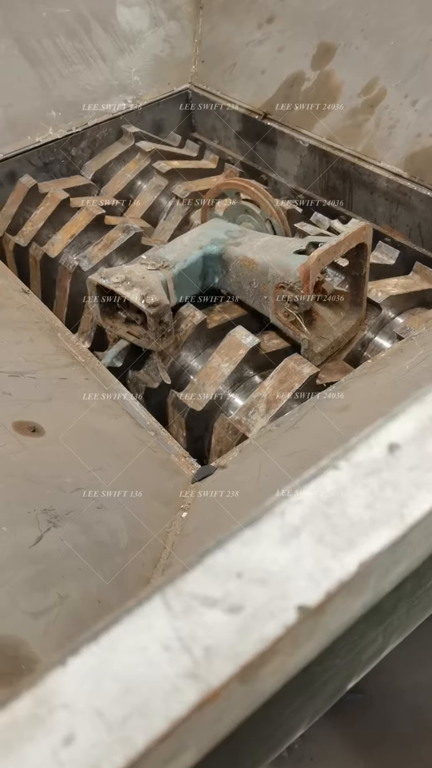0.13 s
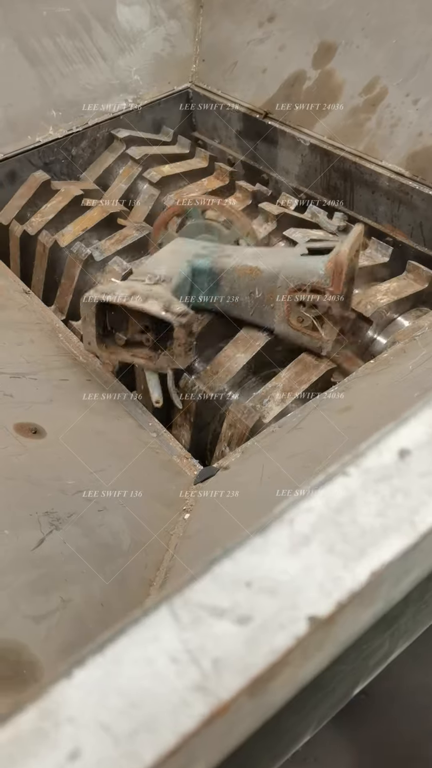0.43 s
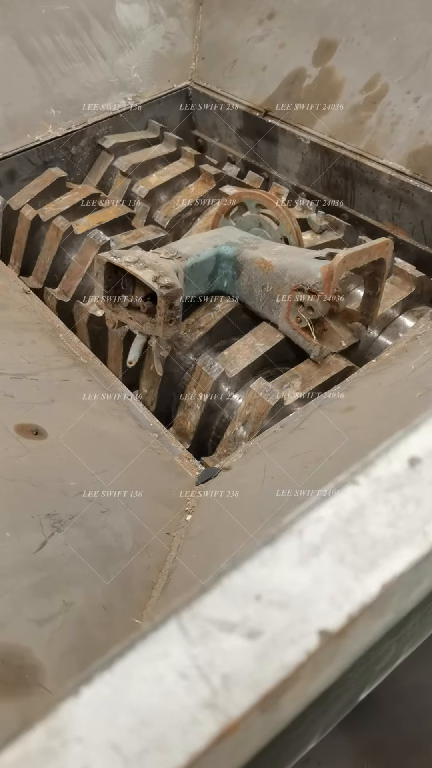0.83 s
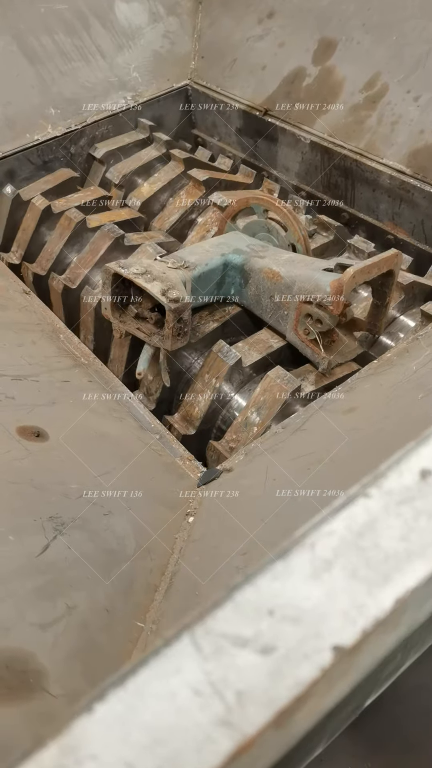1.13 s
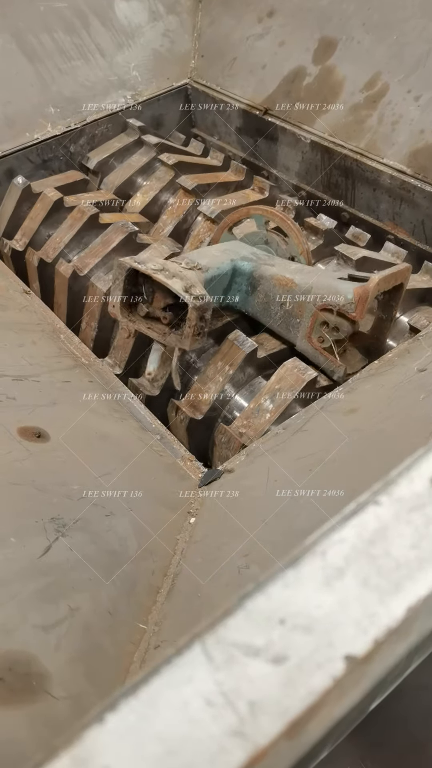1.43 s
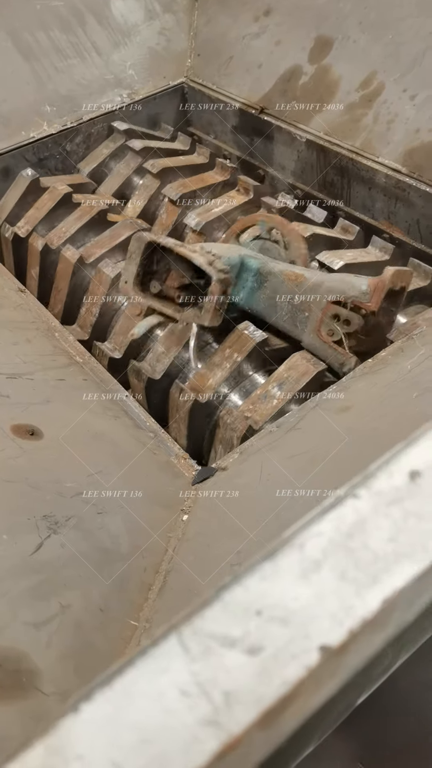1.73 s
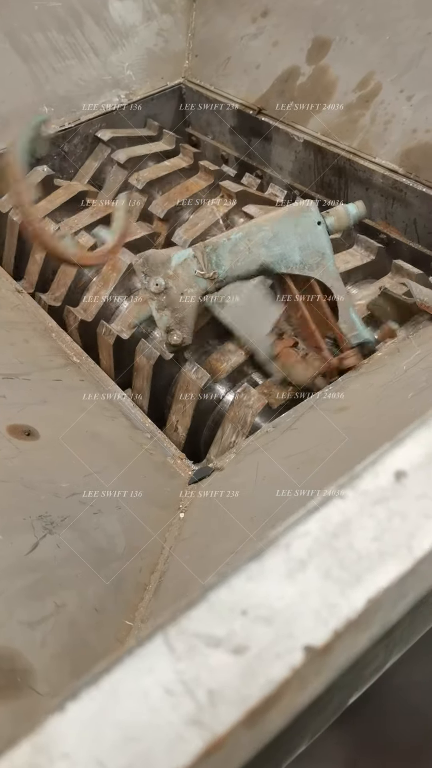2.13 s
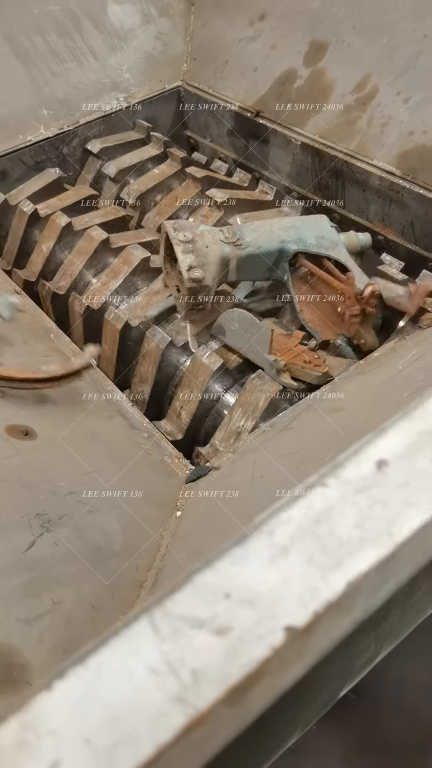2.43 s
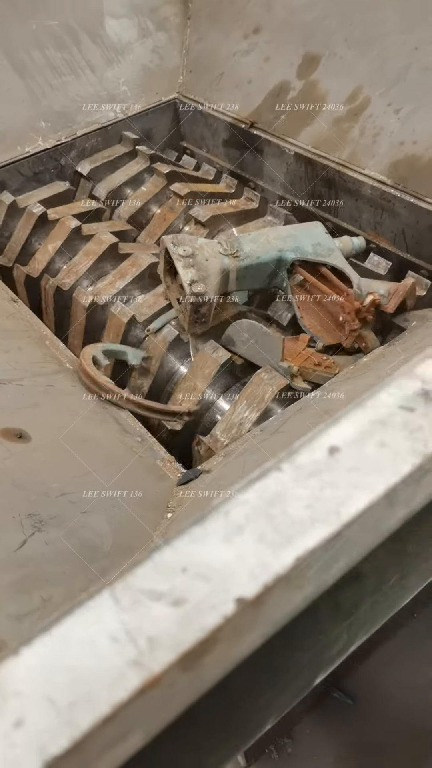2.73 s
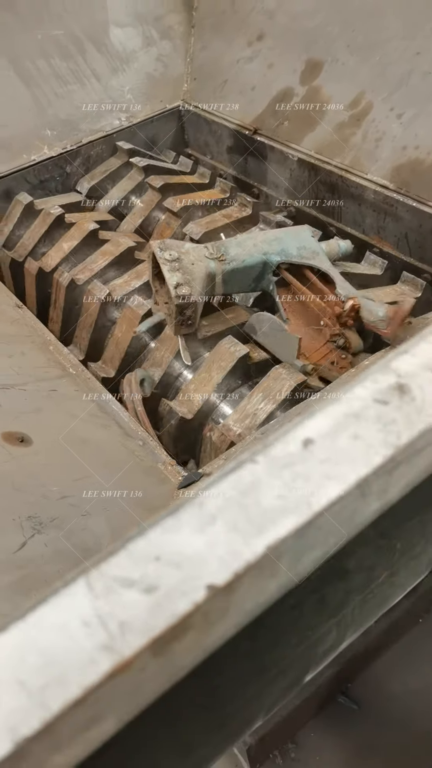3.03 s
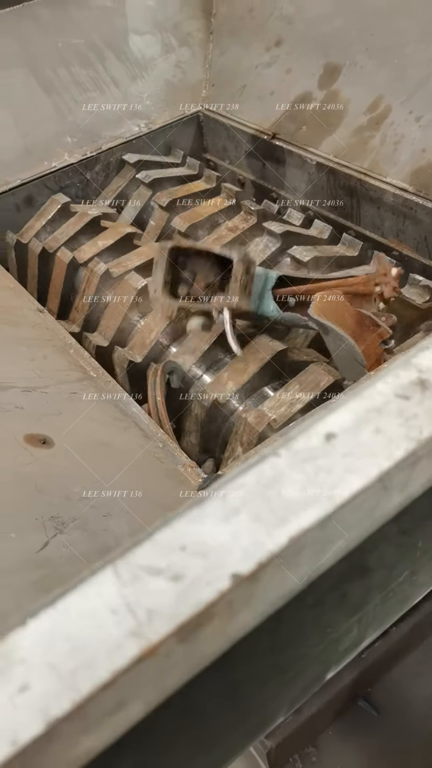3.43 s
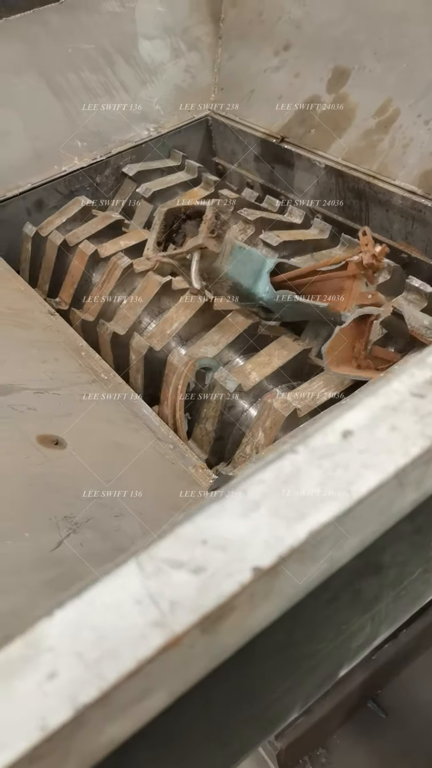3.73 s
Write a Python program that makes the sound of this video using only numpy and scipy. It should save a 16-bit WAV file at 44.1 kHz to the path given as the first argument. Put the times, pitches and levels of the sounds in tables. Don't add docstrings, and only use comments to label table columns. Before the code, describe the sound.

A heavy shredder starts almost quiet, a ringing shard fading, then bites a metal casting at 0.25 s with cracks and booming rumble. From 0.5 to 1.4 s the load eases under thin, wavering squeals and small ticks. Dense tearing, bangs and bright cracks fill 1.5-2.6 s. After a squeaky lull, heavy thuds hit at 3.1 and 3.4 s, easing into faint squeals by 3.9 s.

```python
import sys
import numpy as np
from scipy import signal
from scipy.fft import rfft, irfft, next_fast_len
from scipy.io import wavfile
from scipy.ndimage import uniform_filter1d, map_coordinates

SR = 44100
rng = np.random.default_rng(int(sys.argv[2]) if len(sys.argv) > 2 else 0)


def wrap_up_sound(samples):
    columns = np.atleast_2d(samples).T
    tamed = np.clip(columns, -1, 1)
    steps = np.round(tamed * 32767).astype(np.int16)
    wavfile.write(sys.argv[1], SR, steps)


def ratio_of_db(decibels):
    return 10 ** (np.asarray(decibels, float) / 20)


N = 171990

# time in seconds, shaft load in dB, tearing in dB, shard clatter in dB.
WORK = [(0, -31, -46, -40.5), (.245, -30.5, -61.5, -42), (.32, -12.5, -30.5, -23.5),
        (.44, -15.5, -33, -24.5), (.62, -19.5, -38, -32.5), (1.1, -24, -47, -41), (1.18, -18, -38, -39.5),
        (1.42, -16.5, -34.5, -37), (1.6, -18, -31, -27), (1.69, -13, -25, -24), (2.22, -14.5, -24, -25),
        (2.27, -16, -19.5, -26), (2.62, -19, -31, -26.5), (2.8, -23.5, -42, -36.5), (3.08, -24, -34, -38),
        (3.12, -17, -30.5, -29), (3.55, -15.5, -31, -27), (3.9, -25, -43.5, -37)]
# frequency in Hz, width in Hz, level in dB.
FRAME_MODES = [(30, 20, -23), (48, 8.3, -11.5), (89.7, 21.4, -8), (123.1, 17.1, -3), (146.3, 13.4, 1),
               (167.4, 25.3, -3.5), (207.4, 28.4, -2.5), (273.5, 13, -6)]
# frequency in Hz, width in Hz, level in dB.
HOPPER_MODES = [(239.5, 44, -2.5), (315.3, 29, 3.5), (371.3, 35.4, 2.5), (466, 129, -5.5)]
# frequency in Hz, width in Hz, level in dB.
CASTING_MODES = [(641.5, 20.6, 2), (880, 213, 2.5), (1290, 1150, -4.5), (2030, 183, 1), (2300, 194, -5),
                 (2770, 410, -6.5), (3530, 280, -17.5), (4216, 210, -9)]
# frequency in Hz, width in Hz, level in dB.
SHARD_MODES = [(1210, 160, -1.5), (2310, 110, 0.5), (2540, 71, 0.5), (2820, 94, -1.5), (3440, 84, -1),
               (6780, 140, -5.5)]
# time in seconds, peak in dB.
JOLTS = [(0.317, -14), (0.386, -4), (0.659, -11), (.723, -20), (0.82, -12), (.88, -13), (1.208, -9),
         (1.375, -15), (1.537, -8), (1.589, -9), (2.041, -9), (2.093, -8), (2.64, -14), (2.887, -12),
         (3.037, -5), (1.899, -4), (2.271, -10), (3.111, 6), (3.28, -13), (3.386, 4)]
# time in seconds, peak in dB.
BANGS = [(0.391, -2.5), (1.44, -6), (1.469, -4), (1.652, -0.5), (1.679, 2), (1.715, 1.5), (1.75, -1),
         (1.844, -3), (1.939, -3), (3.106, 0), (3.126, -5), (3.29, -4.5), (3.401, -4), (3.47, -7)]
# time in seconds, peak in dB, ring in Hz, T60 in seconds,
# brightness in dB per octave.
CRACKS = [(0.2029, -31.5, 850, 0.16, -4.5), (0.2593, -1.5, 2280, 0.029, -8),
          (0.3082, -9.5, 2230, 0.049, -7.5), (0.3581, -11.5, 2130, 0.068, -8.5),
          (0.3845, -10, 2030, 0.18, -16), (0.4284, -11.5, 676, 0.072, -6), (0.6684, -10, 1025, 0.029, -8.5),
          (0.7764, -15, 4720, 0.027, 9), (1.0146, -15.5, 4700, 0.044, -3.5), (1.0374, -15, 4500, 0.03, 13),
          (1.5204, -3, 2150, 0.026, 6.5), (1.5479, -6.5, 940, 0.05, -6.5), (1.6317, -1, 2930, 0.091, 9),
          (1.8746, -6, 2020, 0.044, -0.5), (1.926, -1, 750, 0.052, 15), (2.2393, -7, 5950, 0.21, 1),
          (2.4618, -9.5, 810, 0.22, -2), (3.0001, -12, 2850, 0.083, 0), (3.0884, -7, 2100, 0.13, -4.5),
          (3.4294, -12.5, 820, 0.058, -6)]
FIRST_CRACK = [
    (0.2488, -11.5, 4230, 0.1, 1.1),
]
LATE_CHIP = [
    (3.0565, -12, 0, .03, 2),
]
# time in seconds, peak in dB, T60 in seconds,
# brightness in dB per octave.
CHIPS = [(0.507, -18, 0.046, -3), (0.815, -35, .03, 3), (0.9981, -20, .03, 2), (1.2266, -29, .04, 3),
         (1.3144, -22, .04, 3), (1.412, -15, .04, 3), (1.465, -12, 0.047, -8.5), (1.8235, -8, .05, 7),
         (1.957, -10.5, .08, -4), (2.051, -9, .1, 2), (2.172, -11, .05, 0), (2.712, -27, .04, 2),
         (2.9026, -24, 0.12, 2), (3.277, -15, 0.056, 4), (3.472, -14, 0.062, -1), (3.7833, -24, .03, 1),
         (3.8232, -21, 0.035, 0)]
# time in seconds, pitch in Hz, level in dB.
SQUEALS = [
    [(.53, 4760, -48), (.575, 4770, -45), (.61, 4780, -54), (.64, 4770, -46), (.71, 4800, -45),
     (.73, 4815, -38), (.76, 4790, -43), (.79, 4850, -36), (.825, 4830, -43)],
    [(.83, 4800, -42), (.886, 4620, -36), (.925, 4635, -31), (1.0, 4620, -34), (1.03, 4640, -43),
     (1.042, 4520, -35), (1.06, 4620, -43), (1.095, 4640, -36), (1.11, 4640, -44)],
    [(1.17, 4620, -36), (1.225, 4600, -37), (1.245, 4720, -42), (1.275, 4590, -38), (1.31, 4610, -33),
     (1.35, 4640, -34), (1.372, 4560, -44), (1.385, 4510, -35), (1.42, 4450, -42)],
    [(2.875, 5030, -40), (2.896, 5060, -36), (2.945, 5070, -37), (2.975, 5000, -41), (3.0, 4900, -47),
     (3.07, 4900, -43)],
    [(3.19, 4990, -43), (3.236, 4950, -37), (3.27, 5010, -43), (3.31, 5030, -38), (3.37, 5050, -43)],
    [(3.41, 4900, -43), (3.46, 5000, -41), (3.5, 5000, -46), (3.58, 5030, -38), (3.655, 5060, -39)],
    [(3.685, 4830, -43), (3.72, 4830, -41), (3.75, 4870, -43), (3.79, 4935, -40), (3.86, 4870, -41),
     (3.875, 4820, -46)],
]
OVERTONES_DB = [0, -9, -17]
# start in seconds, length in seconds, pitch in Hz, level in dB.
CHIRPS = [(0.143, .09, 4700, -56), (1.218, .035, 3640, -43), (1.285, 0.07, 3640, -43),
          (1.47, 0.055, 4850, -38), (1.17, .06, 11500, -53), (1.3, .05, 12300, -52), (1.24, .04, 5500, -48),
          (1.655, 0.06, 2350, -33), (2.586, 0.054, 6830, -42), (2.56, 0.13, 2030, -38),
          (2.64, .08, 6900, -48), (2.844, 0.025, 6950, -46), (2.92, .08, 11900, -54),
          (2.95, .05, 6950, -49), (2.995, .025, 2880, -41), (3.115, .025, 860, -27),
          (3.882, .04, 5480, -37)]
# frequency in Hz, density in dB per Hz.
TEAR_COLOUR = [(300, 1), (600, -3.5), (2000, -2), (5000, -3.5), (10000, -4.5), (16000, -13)]
# frequency in Hz, T60 in seconds.
BAY_T60 = [(200, 0.81), (2000, 0.36), (10000, 0.68)]
# frequency in Hz, correlation from -1 to 1.
ALIKE = [(60, 0.89), (150, 1), (380, 0.79), (950, -0.0062), (2380, -0.042), (5980, 0.015), (15000, -0.07)]
# frequency in Hz, gain in dB.
LEFT_PORT = [(150, 1.5), (370, -2), (700, 2), (2400, -0.5), (6700, 2), (8600, -1.5), (10200, 4.5),
             (15000, -3.5)]
# frequency in Hz, gain in dB.
RIGHT_PORT = [(4500, 0.5), (5700, 1), (6600, 10.5), (7700, 12), (8300, -6), (10600, -2), (12300, -8),
              (15000, -4)]


def unit(x):
    return x / np.sqrt(np.mean(x ** 2) + 1e-20)


def along(points, hz):
    point_hz, value = np.transpose(points)
    return np.interp(np.log(hz + 1), np.log(point_hz + 1), value)


def curves(rows):
    s, *columns = np.transpose(rows)
    return [np.interp(np.arange(N) / SR, s, column) for column in columns]


def wobble(rate_hz):
    knots = rng.standard_normal(int(N * 400 / SR) + 4)
    return map_coordinates(knots, [np.arange(N) * min(rate_hz, 400) / SR])


def filtered(x, response):
    size = next_fast_len(x.shape[-1] + 8192)
    spectrum = rfft(x, size) * response(np.fft.rfftfreq(size, 1 / SR))
    return irfft(spectrum, size)[..., :x.shape[-1]]


def body(modes):
    def response(f):
        total = 0
        for k, (hz, width_hz, db) in enumerate(modes):
            damping = 1j * f * width_hz
            total = total + (-1) ** k * ratio_of_db(db) * damping / (hz * hz - f * f + damping)
        return total
    return response


def spread(pair):
    def mid_side(hz):
        turn = np.arccos(np.clip(along(ALIKE, hz), -1, 1)) / 2
        return np.array([np.cos(turn), np.sin(turn)])
    mid, side = filtered(pair, mid_side)
    return np.array([mid + side, mid - side])


def grit(per_s, spiky_db, grain_s, share):
    starts = (rng.random(N) < per_s / SR) * ratio_of_db(spiky_db * rng.random(N))
    grains = signal.lfilter([1], [1, -np.exp(-1 / (grain_s * SR))], starts)
    power = 1 - share + share * unit(grains) ** 2
    return rng.standard_normal((2, N)) * np.sqrt(power)


def patchy(x, depth_db):
    z = signal.stft(x, nperseg=512)[2]
    field = uniform_filter1d(rng.standard_normal(z.shape[1:]), size=9, axis=0)
    field = uniform_filter1d(field, size=7, axis=1)
    return signal.istft(z * ratio_of_db(depth_db * unit(field)), nperseg=512)[1][:, :N]


def faint_hiss():
    hiss = filtered(rng.standard_normal((2, N)), lambda hz: hz / (hz + 500) / (1 + (hz / 5000) ** 2))
    return ratio_of_db(-60) * unit(hiss)


def bay(x):
    hz, t, z = signal.stft(rng.standard_normal((2, SR)), SR, nperseg=256)
    tail = signal.istft(z * ratio_of_db(-60 * t / along(BAY_T60, hz)[:, None]), SR, nperseg=256)[1]
    delayed = np.pad(x, ((0, 0), (400, 0)))
    return signal.fftconvolve(delayed, tail / np.linalg.norm(tail[0]), axes=1)[:, :N]


def shard():
    once = filtered(rng.standard_normal((2, N)), body(SHARD_MODES))
    ring = unit(filtered(once, body(SHARD_MODES)))
    t60_s = 0.53
    return ring * ratio_of_db(-31 - 60 * np.arange(N) / SR / t60_s)


def frame():
    load_db = curves(WORK)[0]
    shake = unit(spread(filtered(grit(45, 11, 0.0081, 0.3), body(FRAME_MODES))))
    blows = np.zeros(N)
    for s, db in JOLTS:
        blows[round(s * SR)] = ratio_of_db(db + 23.5) * rng.choice([-1, 1])
    return shake * ratio_of_db(load_db + 0.36 * wobble(12)) + filtered(blows, body(FRAME_MODES + HOPPER_MODES))


def hopper():
    load_db, _, clatter_db = curves(WORK)
    clatter_share = 0.57
    level_db = -23 + (1 - clatter_share) * (load_db + 14.5) + clatter_share * (clatter_db + 27)
    panels = unit(spread(filtered(grit(60, 1.2, 0.0073, 0.34), body(HOPPER_MODES))))
    bangs = np.zeros(N)
    for s, db in BANGS:
        bangs[round(s * SR)] = ratio_of_db(db + 32.5)
    return panels * ratio_of_db(level_db) + filtered(bangs, body(HOPPER_MODES))


def squeal():
    t, out = np.arange(N) / SR, np.zeros(N)
    for rows in SQUEALS:
        hz, db = curves(rows)
        start_s, end_s = rows[0][0], rows[-1][0] + 0.007
        gate = np.clip(np.minimum(t - start_s, end_s - t) / 0.0051, 0, 1)
        phase = 2 * np.pi * np.cumsum(hz + 20 * wobble(35) + 26 * wobble(300)) / SR
        tone = sum(ratio_of_db(o_db) * np.sin((k + 1) * phase) for k, o_db in enumerate(OVERTONES_DB))
        out += gate * ratio_of_db(db + 6 + 2.6 * wobble(45) + 0.8 * wobble(170)) * tone
    return out


def chirps():
    t, out = np.arange(N) / SR, np.zeros(N)
    for start_s, length_s, hz, db in CHIRPS:
        gate = np.clip(np.minimum(t - start_s, start_s + length_s - t) / 0.0056, 0, 1)
        phase = 2 * np.pi * np.cumsum(hz + 40 * wobble(250)) / SR
        out += gate * ratio_of_db(db + 8.5 + 1.5 * wobble(80)) * np.sin(phase)
    return out


def clatter():
    clatter_db = curves(WORK)[2]
    grains = patchy(grit(90, 2.4, 0.026, 0.27), depth_db=2.5)
    return unit(spread(filtered(grains, body(CASTING_MODES)))) * ratio_of_db(clatter_db + 0.72 * wobble(16))


def tearing():
    tear_db = curves(WORK)[1]
    grains = patchy(grit(80, 6.7, 0.01, 0.14), depth_db=2.0)
    hiss = unit(spread(filtered(grains, lambda hz: ratio_of_db(along(TEAR_COLOUR, hz)))))
    return hiss * ratio_of_db(tear_db + 4.5 + 1.2 * wobble(14))


def cracks():
    out, t = np.zeros((2, 2, N + SR)), np.arange(SR // 4) / SR
    attack = 1 - np.exp(-t / 0.00047)
    chips = [(s, db, 0, t60_s, tilt_db) for s, db, t60_s, tilt_db in CHIPS]
    for s, db, hz, t60_s, tilt_db in FIRST_CRACK + LATE_CHIP + CRACKS + chips:
        low_cut_hz = min(hz or 1800, 1800)

        def colour(f):
            return ratio_of_db(tilt_db * np.log2((f + 200) / 4000)) * f * f / (f * f + low_cut_hz ** 2)

        burst = unit(filtered(rng.standard_normal((2, len(t))), colour))
        burst = burst * (ratio_of_db(-60 * t / max(t60_s, 0.01)) + 0.27 * ratio_of_db(-60 * t / 0.0019))
        note = 2.18 * (hz > 0) * np.sin(2 * np.pi * (hz * t + rng.random((2, 1))))
        note = note * ratio_of_db(-60 * t / 0.03 - 0.5 * max(tilt_db + 12, 0))
        start = round(s * SR)
        out[..., start:start + len(t)] += ratio_of_db(db - 5.5) * attack * np.array([burst, note])
    return out[..., :N]


def scene():
    bursts, notes = cracks()
    tone = squeal() + chirps()
    tone = np.array([tone, np.roll(tone, 12)])
    background = faint_hiss() + shard() + frame() + hopper()
    walls = ratio_of_db(-4) * bay(bursts) + ratio_of_db(-6) * bay(tone)
    return background + walls + tone + clatter() + tearing() + bursts + notes


def low_pass(x):
    return signal.sosfilt(signal.butter(12, 16370, fs=SR, output="sos"), x)


def record(dry):
    ceiling, top_hz = 1.1, 15400
    x = filtered(dry, lambda hz: ratio_of_db([along(LEFT_PORT, hz), along(RIGHT_PORT, hz)]))
    x = x / (1 + np.abs(x / ceiling) ** 6) ** (1 / 6)
    x = filtered(x, lambda hz: 1 / (1 + (hz / top_hz) ** 200))
    return low_pass(x)


dry = scene()
out = record(dry)
wrap_up_sound(out)
```